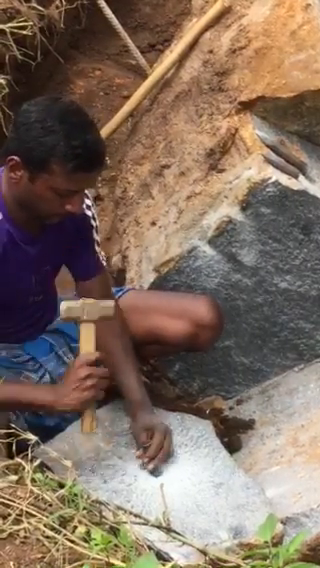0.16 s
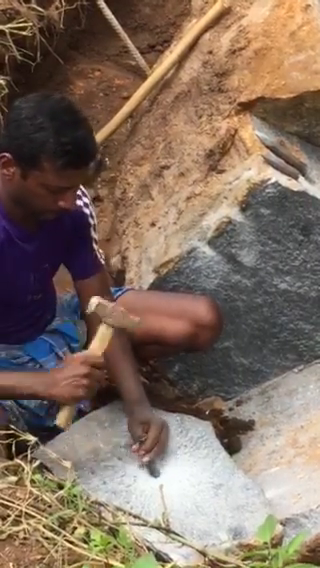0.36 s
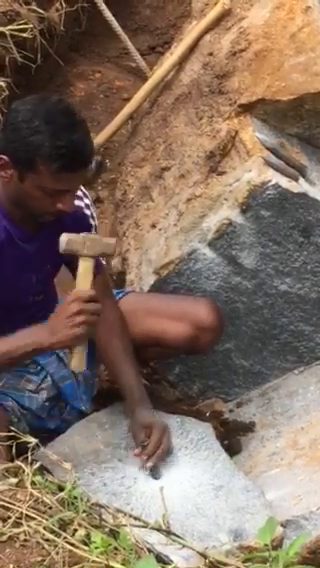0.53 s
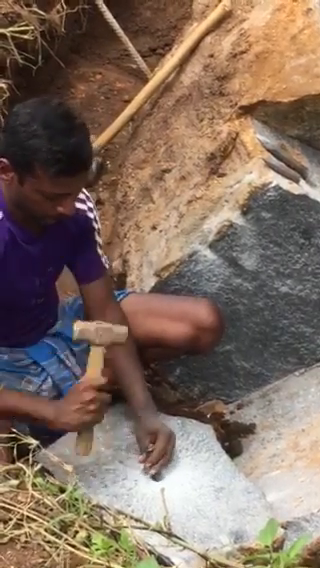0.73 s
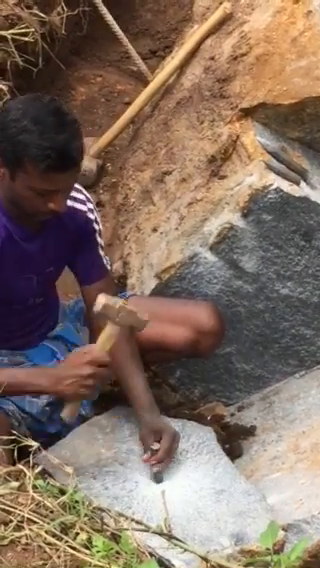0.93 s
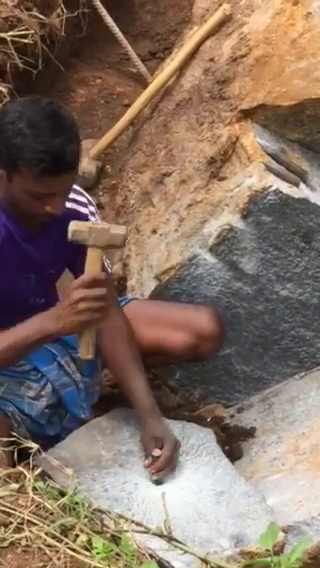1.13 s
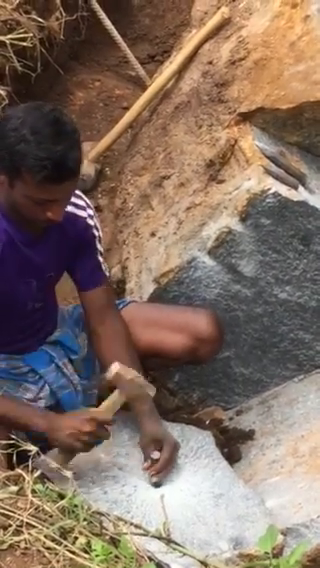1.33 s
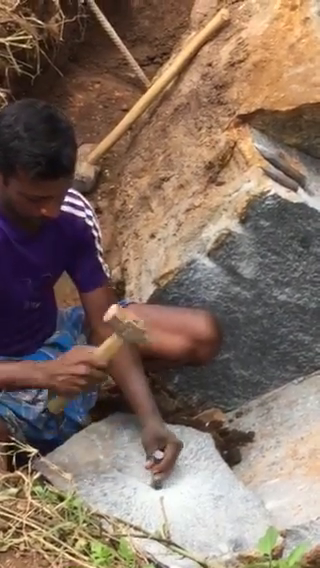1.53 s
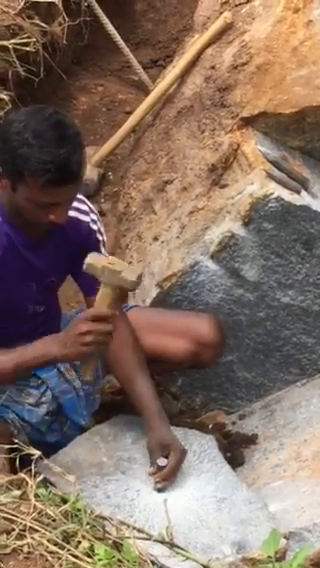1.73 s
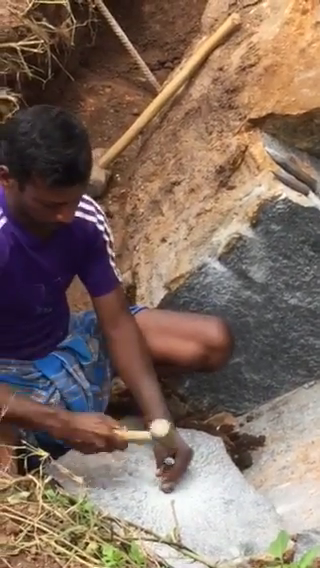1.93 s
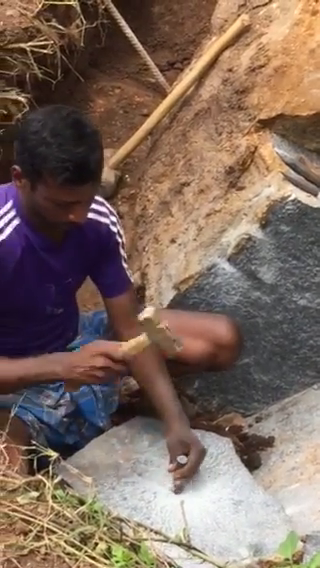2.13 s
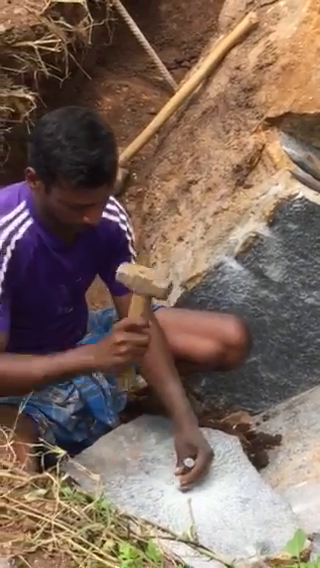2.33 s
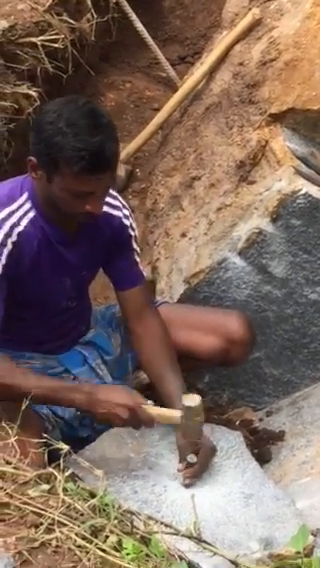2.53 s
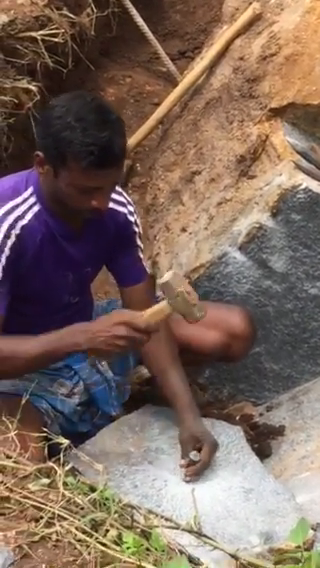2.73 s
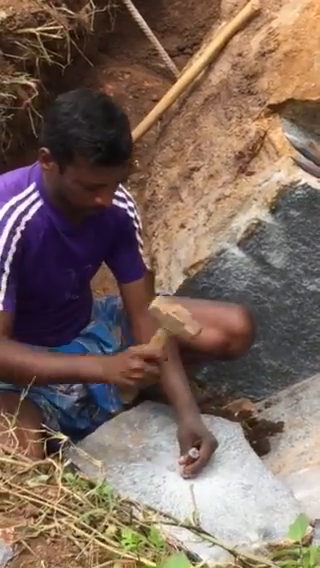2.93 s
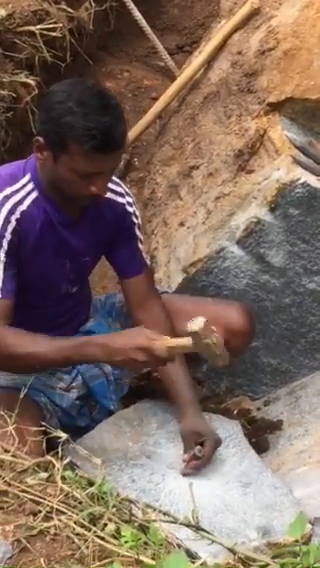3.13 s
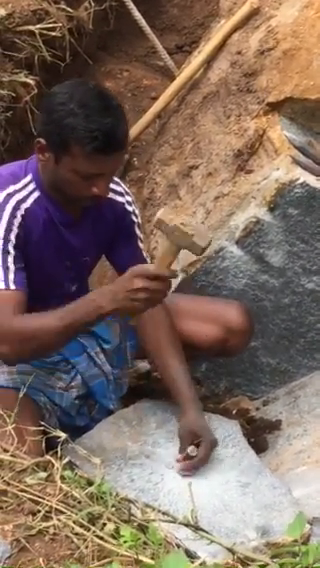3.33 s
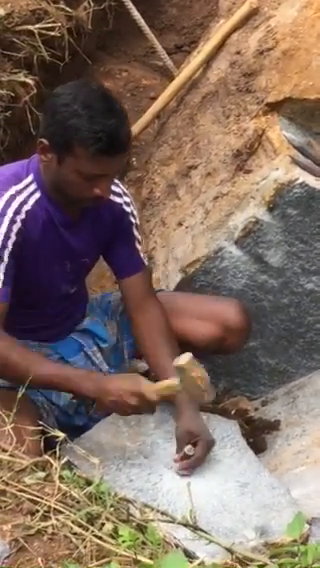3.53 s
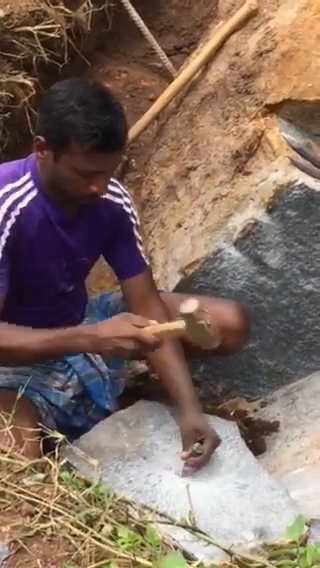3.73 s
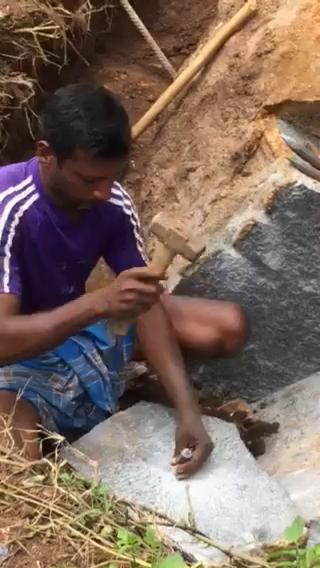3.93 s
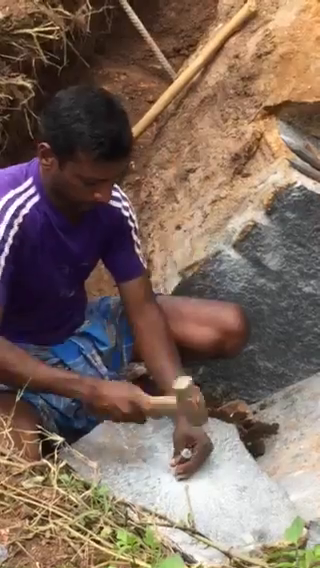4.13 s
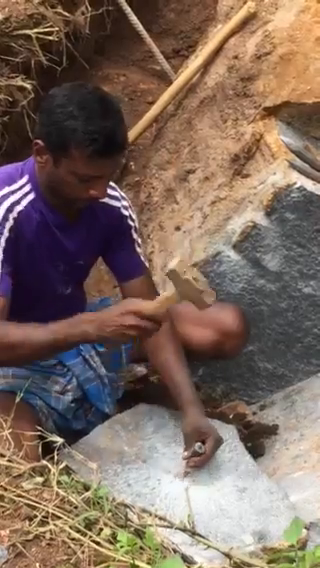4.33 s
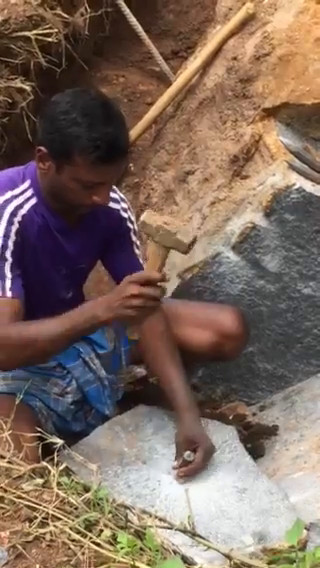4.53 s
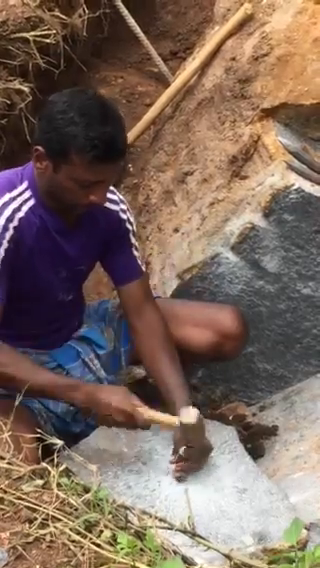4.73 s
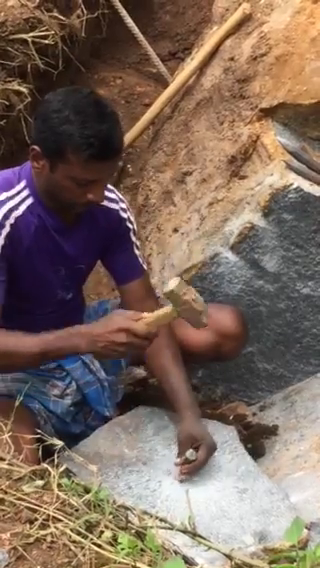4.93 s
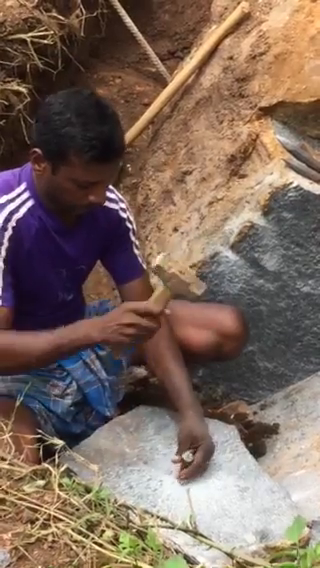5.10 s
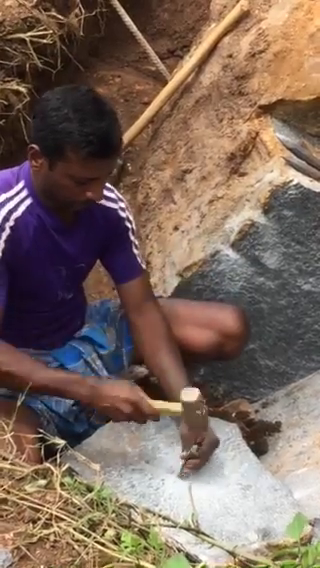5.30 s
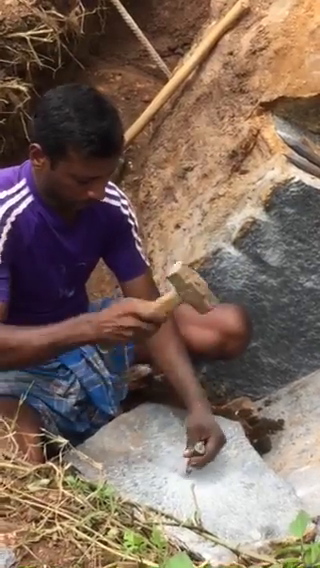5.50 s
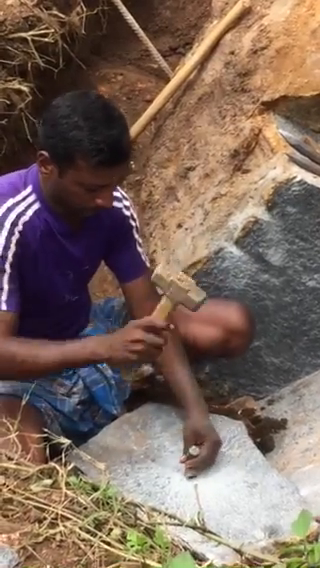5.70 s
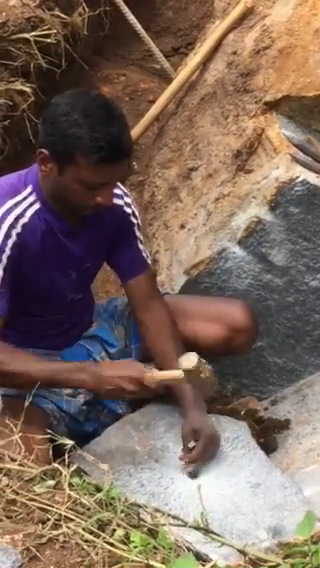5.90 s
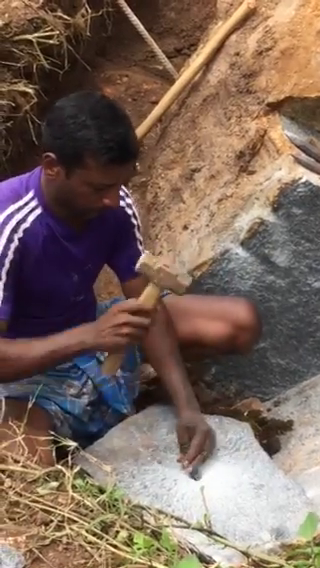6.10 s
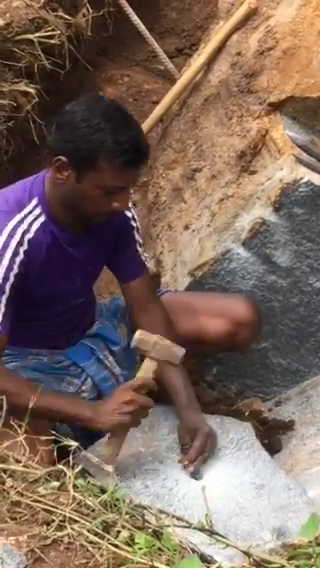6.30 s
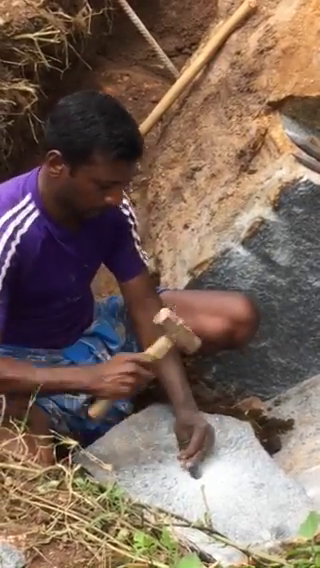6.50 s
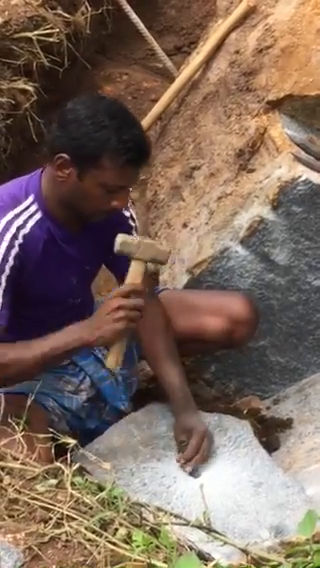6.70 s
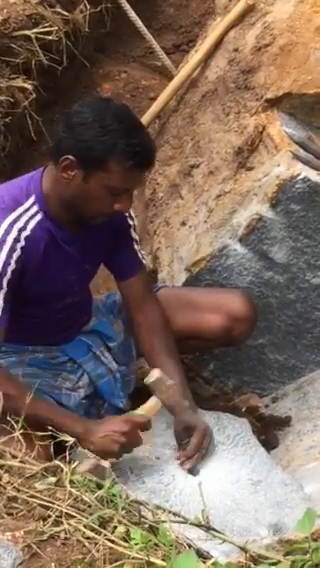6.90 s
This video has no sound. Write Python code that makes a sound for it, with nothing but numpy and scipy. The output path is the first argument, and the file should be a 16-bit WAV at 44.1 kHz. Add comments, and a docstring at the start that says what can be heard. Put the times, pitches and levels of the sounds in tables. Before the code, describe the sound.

Steady hammer blows on a chisel crack against a stone slab, each with a short, high metallic ring, over quiet open air.

```python
"""An earth pit: a mason drives a short steel chisel into a granite slab with a hand hammer, twelve even
blows. Each crushes stone, knocks the slab and sets the chisel ringing. A tip that bites crunches more and
rings less, a sharp contact trades knock for treble, and heavy blows thump the ground. Between blows the
chisel clinks as it is turned. Air, insects and far birds sound behind; a limiter ducks after peaks."""
import sys
import numpy as np
from scipy import signal
from scipy.io import wavfile
from scipy.ndimage import minimum_filter1d

SR = 44100
rng = np.random.default_rng(int(sys.argv[2]) if len(sys.argv) > 2 else 0)


def transcribe(u):
    """Save the signal u as a 16-bit wav file named by the first command-line argument.

    u: samples, shape (n,) or (channels, n), limited to [-1, 1]; the rate is SR.
    q: integer samples, one column per channel.
    """
    v = np.clip(np.atleast_2d(u).T, -1, 1)
    q = np.round(v * 32767).astype(np.int16)
    wavfile.write(sys.argv[1], SR, q)


N = 306495
TIME_S = np.arange(N) / SR
AGE_S = np.arange(SR // 2) / SR   # time since a contact
CUTOFF_HZ = 15900


def from_db(db):
    return 10 ** (np.asarray(db) / 20)


def unit_rms(x):
    return x / np.sqrt(np.mean(x ** 2) + 1e-20)


def at_level(x, db, window_s=0.032):
    """Scale to an rms level, all energy counted as within window_s."""
    return from_db(db) * x / np.sqrt(np.sum(x ** 2) / (window_s * SR) + 1e-20)


def decay(t60_s):
    return np.exp(-np.minimum(np.log(1000) * AGE_S / t60_s, 40))


def bandpass(x, low_hz, high_hz, order=3):
    sos = signal.butter(order, [low_hz, high_hz], "band", fs=SR, output="sos")
    return signal.sosfilt(sos, x + 1e-18)


def smooth(x, lag_s):
    """One-pole lag."""
    pole = np.exp(-1 / (lag_s * SR))
    return signal.lfilter([1 - pole], [1, -pole], x + 1e-18)


def add(track, time_s, sound):
    start = max(round(time_s * SR), 0)
    part = sound[:max(N - start, 0)]
    track[start:start + len(part)] += part


def noise(size=len(AGE_S)):
    return rng.standard_normal(size)


def narrow_noise(hz, width_hz, size=len(AGE_S)):
    """Wavering tone, rms 1."""
    return unit_rms(bandpass(noise(size), hz - width_hz / 2, hz + width_hz / 2))


def drift(rate_hz):
    """Slow random curve through knots of spread 1."""
    return np.interp(TIME_S * rate_hz, np.arange(400), noise(400))


def ring(modes, spread_db=2.5):
    """Struck modes: new strengths at each contact, alternating signs."""
    out = 0
    for k, (hz, db, t60_s) in enumerate(modes):
        gain = (-1) ** k * from_db(db + spread_db * rng.standard_normal())
        out = out + gain * decay(t60_s) * np.sin(2 * np.pi * hz * AGE_S)
    return out


# open-air spectrum: (frequency [Hz], relative density [dB])
AIR_SPECTRUM = [(25, -31), (55, -6), (95, -8), (200, -20), (450, -24.5), (620, -21), (850, -25),
                (1250, -21), (1700, -24.5), (2600, -26.5), (4800, -38.5), (8000, -45.5), (15500, -41)]
def air(level_db=-56.5, flicker_db=0.15, gust_db=7.5):
    """Outdoor hush in half-octave bands; the breeze makes the lowest lumpy."""
    points_hz, points_db = np.transpose(AIR_SPECTRUM)
    edges_hz = np.geomspace(22, 16000, 20)
    out = np.zeros(N)
    for low_hz, high_hz in zip(edges_hz, edges_hz[1:]):
        db = np.interp(np.log(low_hz * high_hz) / 2, np.log(points_hz), points_db)
        sway_db = gust_db if high_hz < 150 else flicker_db
        out += from_db(db + sway_db * drift(5.8)) * bandpass(noise(N), low_hz, high_hz)
    return from_db(level_db) * unit_rms(out)


# insect chorus: (centre [Hz], width [Hz], level [dB])
INSECT_BANDS = [(6093, 140, -68.5), (6360, 130, -70.5), (6590, 210, -72.5), (6213, 3300, -77),
                (11500, 500, -82)]
def insects(waver_db=0.5, swell_db=2.5):
    """Many far insects merge into shimmering bands that swell and sink together."""
    swell = from_db(swell_db * drift(3))
    return swell * sum(from_db(db + waver_db * drift(11)) * narrow_noise(hz, width_hz, N)
                       for hz, width_hz, db in INSECT_BANDS)


# first bird, low falling note: (time [s], level [dB])
LOW_BIRD_CALLS = [(0.777, -58), (1.452, -53), (2.848, -57), (2.982, -59.5), (3.582, -58)]
# second bird, whistles: (time [s], start [Hz], end [Hz], level [dB])
BIRD_WHISTLES = [(1.27, 2015, 2014, -51), (4.441, 2880, 3050, -53), (4.618, 3080, 2760, -54.5),
                 (4.727, 2490, 1950, -57)]
def birds(call_s=0.073, call_glide_hz=(1310, 1220), whistle_s=0.064, waver_share=0.027):
    """Two far birds: short glides of unsteady pitch."""
    notes = [(time_s, call_s, *call_glide_hz, db) for time_s, db in LOW_BIRD_CALLS]
    notes += [(time_s, whistle_s, *glide) for time_s, *glide in BIRD_WHISTLES]
    out = np.zeros(N)
    for time_s, length_s, start_hz, end_hz, db in notes:
        progress = np.clip(AGE_S / length_s, 0, 1)
        waver = 1 + waver_share * unit_rms(bandpass(noise(), 6.8, 260))
        hz = (start_hz + (end_hz - start_hz) * progress) * waver
        tone = np.sin(2 * np.pi * np.cumsum(hz) / SR)
        add(out, time_s, from_db(db) * np.sin(np.pi * progress) * tone)
    return out


# scuffs and bumps on the ground: (time [s], length [s], level [dB], centre [Hz])
GROUND_SCUFFS = [(3.484, 0.058, -40.5, 190), (3.487, 0.081, -49, 757), (3.546, 0.081, -48.5, 805),
                 (3.523, 0.17, -46.5, 79), (6.163, 0.11, -45, 59), (6.827, 0.063, -49, 69.3)]
def scuffs(attack_share=0.12):
    """Dull rubs that swell quickly and die away."""
    out = np.zeros(N)
    for time_s, length_s, db, hz in GROUND_SCUFFS:
        swell = np.interp(AGE_S / length_s, [0, attack_share, 1], [0, 1, 0])
        rub = unit_rms(bandpass(noise(), hz / 1.41, hz * 1.31, order=2))
        add(out, time_s, from_db(db) * swell * rub)
    return out


# pit reverberation: (frequency [Hz], t60 [s], gain [dB])
PIT_REVERB = [(350, 0.6, -37.5), (695, 0.55, -33), (1288, 0.47, -31.5), (1990, 0.59, -28.5),
              (3000, 0.3, -31.5), (4500, 0.25, -26.5), (5700, .23, -29.5), (7540, 0.073, -26),
              (11000, 0.4, -28), (15000, 0.24, -30)]
def pit_wash(x, build_s=0.0072, far_wall_s=0.049, far_wall_db=-1.5):
    """Earth walls scatter each band into a diffuse wash; the far wall returns a second swell."""
    points_hz, points_t60_s, points_db = np.transpose(PIT_REVERB)
    edges_hz = np.geomspace(400, 16000, 17)
    arriving = x.copy()
    add(arriving, far_wall_s, from_db(far_wall_db) * x)
    carriers = noise((2, N))   # unrelated noise for adjacent bands
    out = np.zeros(N)
    for k, (low_hz, high_hz) in enumerate(zip(edges_hz, edges_hz[1:])):
        log_centre = np.log(low_hz * high_hz) / 2
        t60_s = np.interp(log_centre, np.log(points_hz), points_t60_s)
        db = np.interp(log_centre, np.log(points_hz), points_db)
        power = bandpass(arriving, low_hz, high_hz) ** 2
        for lag_s in (build_s, build_s, t60_s / np.log(10 ** 6)):
            power = smooth(power, lag_s)
        out += from_db(db) * np.sqrt(power) * unit_rms(bandpass(carriers[k % 2], low_hz, high_hz))
    return out


# modes of chisel and hammer head: (frequency [Hz])
STEEL_HZ = [9275, 10411, 10600, 10855, 10950, 11121, 11760, 14668, 14825]
# the same modes, row for row: (relative level [dB], t60 [s])
STEEL_MODES = [(-6, 0.063), (-5, 0.078), (-6, 0.0074), (-6.5, 0.075), (-6.5, 0.041), (-3, 0.052),
               (-2.5, 0.031), (-10, 0.072), (-13, 0.087)]
def steel_ring(favoured_hz, pitch_ratio=1, favour_db=7, reach_hz=120):
    """Struck steel; modes near the favoured pitch ring harder."""
    modes = []
    for hz, (db, t60_s) in zip(STEEL_HZ, STEEL_MODES):
        boost_db = favour_db * np.exp(-((hz - favoured_hz) / reach_hz) ** 2)
        modes.append((hz * pitch_ratio, db + boost_db, t60_s))
    return ring(modes)


# firmer touches of the chisel in its hole: (time [s], ring [dB], grit [dB])
CHISEL_TOUCHES = [(0.132, -55, -71), (0.69, -59.5, -64.5), (4.009, -62, -73.5), (4.572, -53, -56.5),
                  (5.117, -56, -50), (5.695, -56, -48.5)]
def reseating(turn_delay_s=0.235, scatter_s=0.02, turn_ring_db=-73, turn_grit_db=-76,
              scrape_t60_s=0.061, grains_per_s=1100):
    """Turned after each blow, the tip grates over grains that tick and make the steel sing faintly."""
    turns = [(time_s + turn_delay_s + scatter_s * rng.standard_normal(), turn_ring_db, turn_grit_db)
             for time_s, *_ in HAMMER_BLOWS]
    out = np.zeros(N)
    for time_s, ring_db, grit_db in turns + list(CHISEL_TOUCHES):
        ticks = rng.random(len(AGE_S)) < grains_per_s / SR
        grains = ticks * noise() * decay(scrape_t60_s)
        steel = signal.fftconvolve(grains, steel_ring(STEEL_HZ[1]))[:len(AGE_S)]
        clink = bandpass(steel, 10100, 11500, order=2)
        grit = bandpass(grains, 1150, 3700, order=2)
        add(out, time_s, at_level(clink, ring_db) + at_level(grit, grit_db))
    return out


def ground_thud(thump_db, rest_hz=52, start_rise_hz=410, fall_s=0.0034, rasp_db=-16):
    """A low ground thud whose pitch falls quickly and dies away, with a brief dull rasp."""
    fallen = 1 - np.exp(-AGE_S / fall_s)
    cycles = rest_hz * AGE_S + start_rise_hz * fall_s * fallen
    envelope = fallen ** 2 * decay(0.08) * np.exp(-(AGE_S / 0.036) ** 2)
    thump = envelope * np.sin(2 * np.pi * cycles)
    rasp = bandpass(decay(0.1034) * noise(), 390.5, 600)
    return at_level(thump, thump_db) + at_level(rasp, thump_db + rasp_db)


def slab_song(thump_db, base_db=-41.5, thump_share=0.35):
    """The slab sings on, louder after a heavy thump."""
    return from_db(base_db + thump_share * thump_db) * decay(0.6) * narrow_noise(1950, width_hz=170)


# slab under the chisel: (frequency [Hz], relative level [dB], t60 [s])
SLAB_MODES = [(507, -8.5, 0.0057), (623, -14, 0.1), (653, 1.5, 0.022), (840, 2.5, 0.03), (957, -0.5, 0.033),
              (1478, -15, 0.049), (1850, -15.5, 0.015), (1985, -10, .04)]
def slab_knock(force_db, sharpness, blunt_db=-18.5, sharp_change_db=-7.5):
    """The slab knocks, less under a sharp contact."""
    return at_level(ring(SLAB_MODES), blunt_db + force_db + sharp_change_db * sharpness)


# crushing stone: (low [Hz], high [Hz], burst t60 [s], crumble t60 [s], crumble re burst [dB],
# level [dB], change at full bite [dB], change at full sharpness [dB])
CRUSH_BANDS = [(216, 490, 0.037, 0.037, -23.5, -27.5, 1.5, -4),
               (1183, 2084, 0.035, 0.098, -17, -17, -7, -6.5), (2400, 5770, 0.01, 0.073, -8.5, -22, 7.5, 0),
               (3620, 4550, 0.022, 0.075, -9.5, -25.5, 7.5, -2.5),
               (6030, 10400, 0.047, 0.13, -15.5, -17, -0.5, -2),
               (11750, 14000, 0.018, .075, -12, -25, -5.5, 11.5),
               (13520, 15100, 0.047, 0.14, -20, -26, -4, 10.5)]
def stone_crack(force_db, bite, sharpness, rebound_s=0.0038, rebound_db=-2.5, rebound_t60_s=0.013):
    """Stone crushes in a dense burst, again as the chisel rebounds, then crumbles away."""
    rebound = from_db(rebound_db) * np.interp(AGE_S - rebound_s, AGE_S, decay(rebound_t60_s), left=0)
    out = 0
    for low_hz, high_hz, burst_t60_s, crumble_t60_s, crumble_db, db, bite_db, sharp_db in CRUSH_BANDS:
        crumble = from_db(crumble_db) * decay(crumble_t60_s)
        envelope = np.sqrt(decay(burst_t60_s) ** 2 + rebound ** 2 + crumble ** 2)
        crack = bandpass(envelope * noise(), low_hz, high_hz)
        out = out + at_level(crack, db + force_db + bite_db * bite + sharp_db * sharpness)
    return out


# ring lingering in the pit, blurred by reflections: (centre [Hz], width [Hz], re ring [dB], t60 [s])
RING_TAILS = [(10411, 70, -30, .42), (10855, 90, -33, .38), (11121, 90, -35, .36), (14700, 450, -32, .3)]
def chisel_ring(force_db, favoured_hz, bite, bounce_db=-11, bite_change_db=-14,
                swell_s=0.0024, grip_detune_share=0.002):
    """The chisel rings once the hammer has left it, less when the tip bites; the grip detunes it."""
    ring_db = bounce_db + force_db + bite_change_db * bite
    freed = 1 - np.exp(-AGE_S / swell_s)
    pitch_ratio = 1 + grip_detune_share * rng.standard_normal()
    out = at_level(freed * steel_ring(favoured_hz, pitch_ratio), ring_db)
    for hz, width_hz, db, t60_s in RING_TAILS:
        out += from_db(ring_db + db) * decay(t60_s) * narrow_noise(hz, width_hz)
    return out


# hammer on chisel: (time [s], force [dB], steel pitch favoured by the impact point [Hz],
# ground thump [dB], tip bite [0-1], contact sharpness [0-1])
HAMMER_BLOWS = [(0.4075, -3.5, 10855, -28, .08, 0.2), (0.9565, -1, 10411, -35.5, 0.0, 0.2),
                (1.5221, -0.5, 11760, -30, 0.9, 0.0), (2.0729, -3, 11121, -44.5, 0.85, 0.83),
                (2.6271, -4, 11760, -43.5, 0.99, 0.97), (3.1729, -1, 10870, -31, 0.03, 0.29),
                (3.7232, 1, 10550, -17.5, 0.44, 0.6), (4.296, 2, 11121, -7.5, 0.19, 0.3),
                (4.8579, -2.5, 10411, -10.5, 0.22, 0.22), (5.4065, -0.5, 10411, -33, .55, 0.44),
                (5.965, -1, 10930, -9, 0.15, 0.3), (6.4954, 1.5, 10855, -33, 0.53, 0.26)]
def hammering():
    """Each blow cracks stone, rings steel and thumps the ground: three tracks."""
    stone, steel, ground = np.zeros((3, N))
    for time_s, force_db, favoured_hz, thump_db, bite, sharpness in HAMMER_BLOWS:
        add(stone, time_s, slab_knock(force_db, sharpness) + stone_crack(force_db, bite, sharpness))
        add(steel, time_s, chisel_ring(force_db, favoured_hz, bite))
        add(ground, time_s, ground_thud(thump_db) + slab_song(thump_db))
    return stone, steel, ground


def scene():
    """Mono mix; only crack and knock feed the pit's wash."""
    stone, steel, ground = hammering()
    background = air() + insects() + birds() + scuffs()
    return (background + pit_wash(stone) + reseating() + ground + stone + steel)[None, :]


def limiter(x, threshold_db=-2.1, attack_s=0.0015, hold_s=0.15, release_db_per_s=90):
    """Gain drops on a peak above the bass, holds, then recovers."""
    sensed = bandpass(x, 500, CUTOFF_HZ, order=2)
    over_db = np.maximum(20 * np.log10(np.abs(sensed) + 1e-9) - threshold_db, 0)
    half_hold = round(hold_s * SR / 2)
    # highest peak within the past hold time
    held_db = -minimum_filter1d(-over_db, 2 * half_hold + 1, origin=half_hold, mode="constant")
    ramp_db = release_db_per_s * TIME_S
    reduction_db = np.maximum.accumulate(held_db + ramp_db, axis=-1) - ramp_db
    return x * from_db(-smooth(reduction_db, attack_s))


def record(dry, ceiling=0.8):
    """Limiter, soft clip, steep low-pass."""
    limited = limiter(dry)
    rounded = limited / (1 + (limited / ceiling) ** 6) ** (1 / 6)
    return signal.sosfilt(signal.ellip(10, 0.1, 80, CUTOFF_HZ, fs=SR, output="sos"), rounded)


dry = scene()
out = record(dry)
transcribe(out)
```